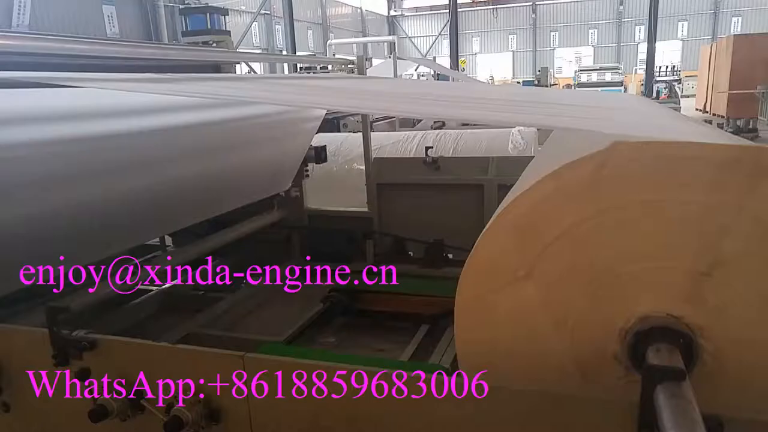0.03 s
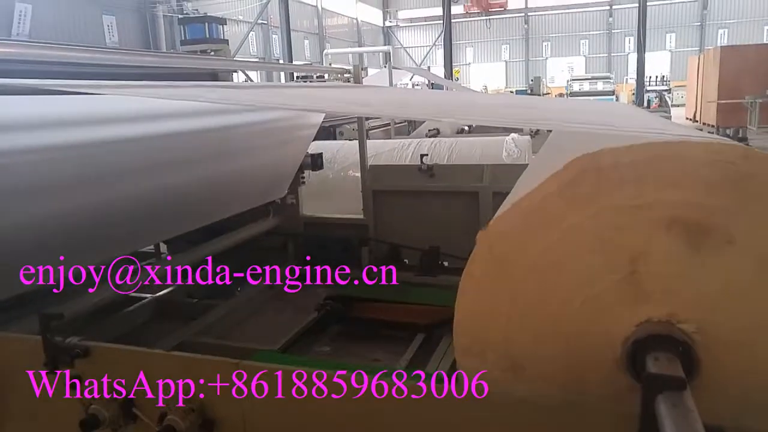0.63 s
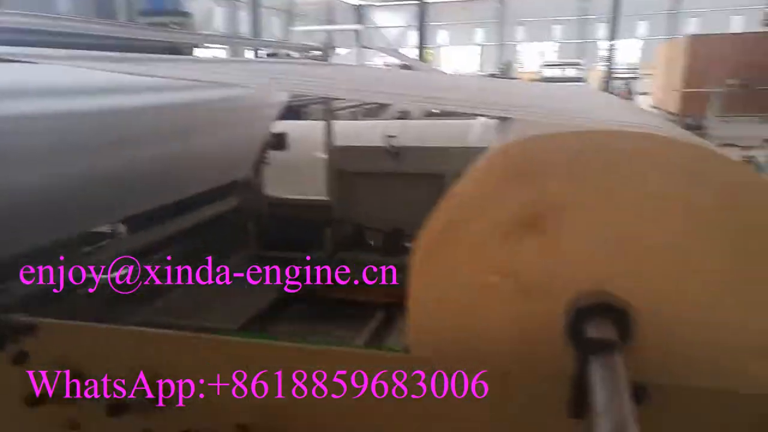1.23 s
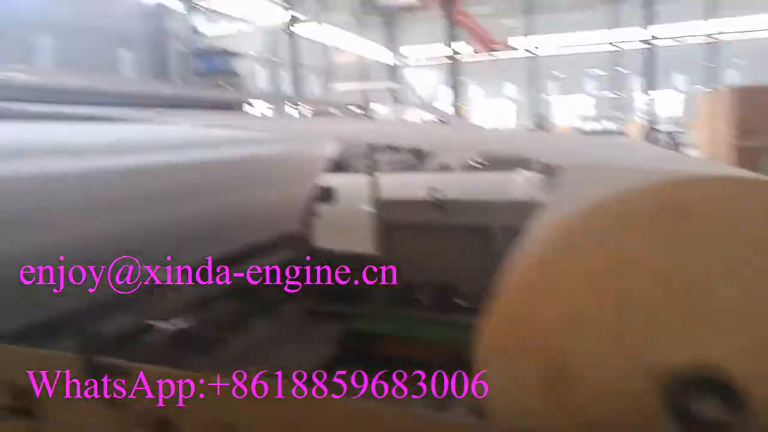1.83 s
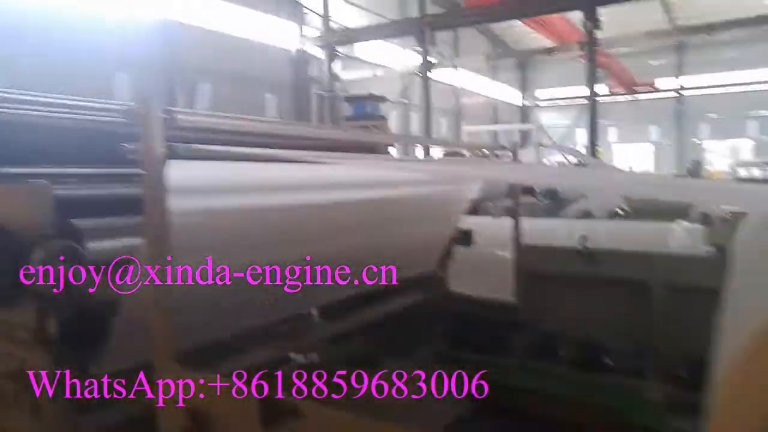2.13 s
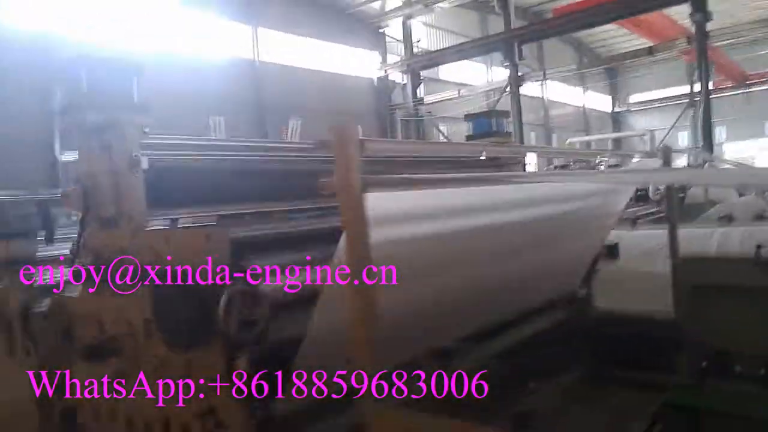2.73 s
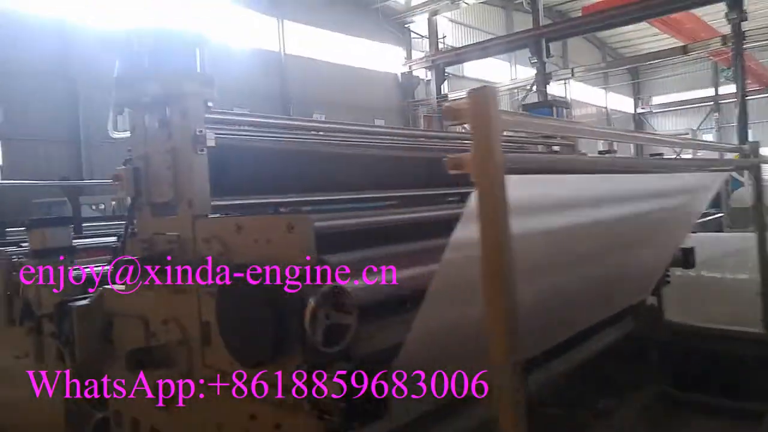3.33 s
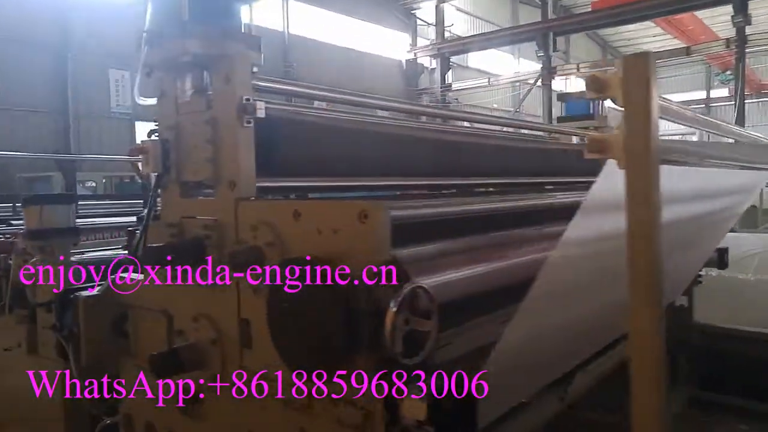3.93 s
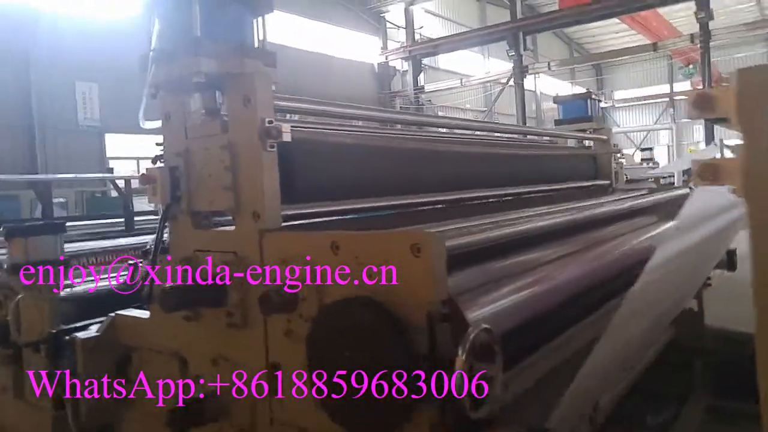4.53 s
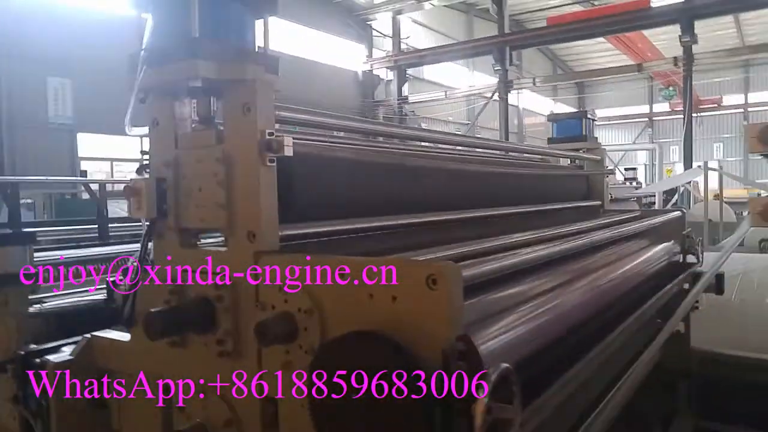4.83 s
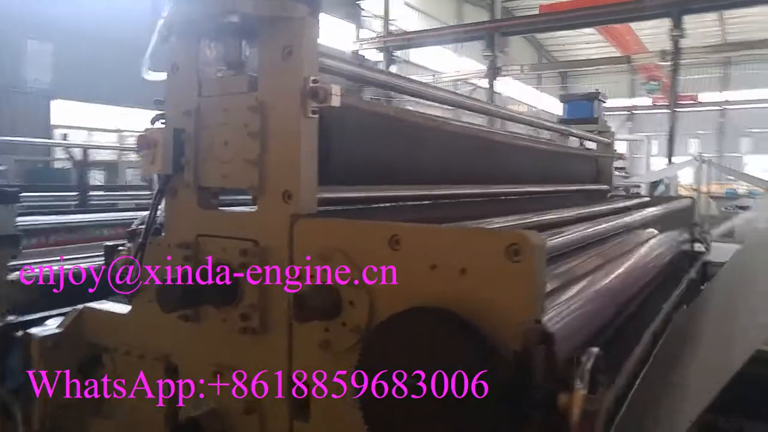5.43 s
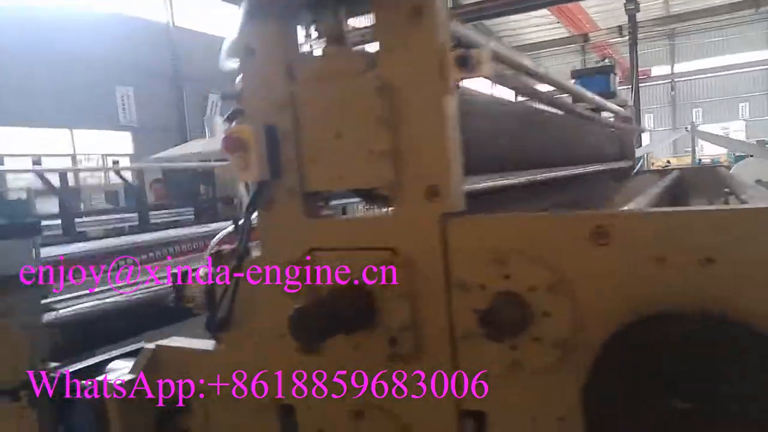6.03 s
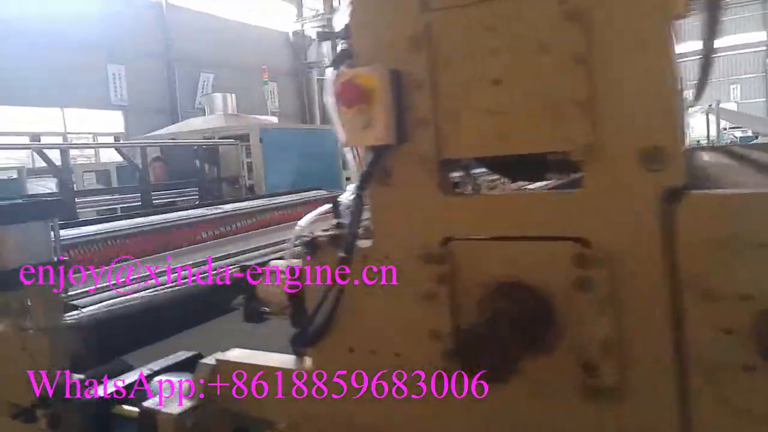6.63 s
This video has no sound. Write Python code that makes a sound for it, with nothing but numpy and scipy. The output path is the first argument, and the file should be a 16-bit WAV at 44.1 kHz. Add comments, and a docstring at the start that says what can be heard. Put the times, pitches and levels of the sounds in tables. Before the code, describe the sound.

After silence, a running paper rewinding machine cuts in abruptly at about 0.6 seconds: a dense rumble, a drone of many gear tones, a fine metallic rattle and a pulsing paper hiss with a faint high whistle. It continues steadily in a large, diffuse factory hall, individual tones swelling and fading as the microphone moves past. From 0.9 to about 3 seconds, paper peels off a big roll in several short swishes, with one sharp knock at 1.2 seconds. From 2.4 seconds onward, the sheet catches on a rubber roller in small, irregular squeaks. Between 3.5 and 5 seconds, the rollers add a throbbing hum, and a bearing whine flares briefly near 4.5 seconds. From about 3.6 seconds the sheet rustles in short bursts, soon also flapping lightly about seven times a second. The machine is still running at the end, around 6.7 seconds.

```python
"""A many-toned drone, a rumble and a pulsing hiss set in together: a paper rewinder, heard on a walk past it.
Gears and rollers sound at multiples of the roller speed, while rolling noise excites the frame's modes.
Friction makes the paper web hiss and a rubber roller squeal; the sheet swishes off the parent roll.
Later the winding roll comes near, and the sheet rustles and flaps with its turns.
The factory hall adds a diffuse field to the direct sound."""
import sys
import numpy as np
from scipy import signal
from scipy.fft import rfft, irfft
from scipy.io import wavfile

SR = 44100
rng = np.random.default_rng(int(sys.argv[2]) if len(sys.argv) > 2 else 0)


def wav_record(signal):
    """Record a signal, one row per channel, as 16-bit PCM in the file named by sys.argv[1]."""
    frames = np.transpose(np.atleast_2d(signal))
    bounded = np.clip(frames, -1, 1)
    # unit amplitude maps onto the largest positive 16-bit level
    quanta = np.round(bounded * 32767).astype(np.int16)
    wavfile.write(sys.argv[1], SR, quanta)


N = 295029
TIME, FREQ = np.arange(N) / SR, np.fft.rfftfreq(N, 1 / SR)
ROLLER_HZ, WINDER_HZ = 12.585, 7.02  # turns a second


def gain_of(db):
    """Decibels to amplitude."""
    return 10 ** (np.asarray(db) / 20)


def unit_rms(x):
    """Normalises to unit rms."""
    return x / np.sqrt(np.mean(x ** 2) + 1e-20)


def spectrum(points):
    """Interpolates on a log-frequency axis."""
    hz, value = np.transpose(points)
    return np.interp(np.log(FREQ + 1), np.log(hz + 1), value)


def follow(rows):
    """Interpolates each column over time."""
    times, *columns = np.transpose(rows)
    return [np.interp(TIME, times, column) for column in columns]


def resonances(modes):
    """Lorentzian peaks in dB."""
    return sum(db / (1 + (2 * (FREQ - hz) / width) ** 2) for hz, width, db in modes)


def drift(rate_hz):
    """Band-limited random motion of unit rms."""
    knots = rng.standard_normal(int(N / SR * 2 * rate_hz) + 4)
    fine = signal.resample(knots, len(knots) * 8)
    return unit_rms(np.interp(TIME * 16 * rate_hz, np.arange(len(fine)), fine))


def pan(left_db):
    """Channel gains for a left-minus-right level difference."""
    return gain_of(np.array([[.5], [-.5]]) * left_db)


def swells(rows, rise=0.48):
    """Skewed Gaussian humps; rise is the share of the length before the peak."""
    return sum(height * np.exp(-((TIME - peak_s) / (length_s * np.where(TIME < peak_s, rise, 1 - rise))) ** 2)
               for peak_s, height, length_s in rows)


def ramp(middle_s, length_s):
    """Linear rise from 0 to 1."""
    return np.clip((TIME - middle_s) / length_s + .5, 0, 1)


def held(start_s, end_s, ramp_s):
    """Trapezoidal envelope."""
    return ramp(start_s, ramp_s) - ramp(end_s, ramp_s)


def once_a_turn(turns, sharpness):
    """A unit hump at every whole turn."""
    return abs(np.cos(np.pi * turns)) ** (2 * sharpness)


# Stereo balance of the noise: frequency_hz, left_db
BALANCE = [(60, 4), (300, 0), (700, 1.1), (1100, 0), (1500, -2), (2100, -1.5), (2800, 2.5), (4500, 1.5),
           (7000, 3.5), (7800, -1), (8400, -2.5), (9300, 1.5), (10300, 0.5), (14000, 3)]
# Sound arriving straight from the machine: frequency_hz, share
DIRECT_SHARE = [(100, 0.24), (1000, 0.36), (2400, 0.37), (4000, 0.098), (7000, .05), (15000, .02)]
def hall_noise(spectrum_db, spacing_s=0.0004, lag_s=0.00044):
    """Spatial coherence: a diffuse field follows a sinc law; direct sound reaches the left first."""
    direct = np.clip(spectrum(DIRECT_SHARE), 0, 1)
    diffuse = (1 - direct) * np.sinc(2 * FREQ * spacing_s)
    coherence = .975 * (diffuse + direct * np.exp(-2j * np.pi * FREQ * lag_s))
    left, independent = rfft(rng.standard_normal((2, N)))
    right = coherence * left + np.sqrt(1 - abs(coherence) ** 2) * independent
    return unit_rms(irfft(np.array([left, right]) * gain_of(spectrum_db) * pan(spectrum(BALANCE)), N))


def band(centre_hz, half_width_hz):
    """Narrow-band noise, frequency-shifted along a pitch curve."""
    middle_hz = np.mean(centre_hz)
    noise = signal.hilbert(hall_noise(-10 * np.log10(1 + ((FREQ - middle_hz) / half_width_hz) ** 4)))
    return (noise * np.exp(2j * np.pi * np.cumsum(centre_hz - middle_hz) / SR)).real


def tones(partials, turns, waver, spread):
    """Rotation tones, modulated by the load and by the walk through standing waves."""
    carrier = max(partials, key=lambda row: row[1])[0]
    turns = turns + rng.random()
    path = drift(0.566) + 0.41
    out = np.zeros((2, N))
    for multiple, db, left_db in partials:
        # eccentricity modulates mainly the pitch: sidebands lie a quarter cycle apart
        phase = 2 * np.pi * multiple * turns + np.pi / 2 * abs(multiple - carrier)
        phase += waver * (drift(1.506) + 0.52 * drift(14))
        # shorter waves differ more between left and right
        offset = spread * multiple * ROLLER_HZ / 1000 * (path + .5 * drift(0.468))
        envelope = gain_of(db) * unit_rms(1 + waver * drift(7))
        out += envelope * pan(left_db) * np.cos([phase + offset, phase - offset])
    return np.sqrt(2) * out


def crackle(events, colour, rise, grain_db):
    """Noise bursts made grainy by fast random amplitude modulation."""
    bursts = swells([(peak_s, gain_of(db), length_s) for peak_s, db, length_s in events], rise)
    return hall_noise(spectrum(colour)) * bursts * unit_rms(gain_of(grain_db * drift(400)))


# Gear tones, one list per shaft group: roller_multiple, base_level_db, left_db
GEAR_TONES = [
    [(11, -36, 1)],
    [(12, -34, 2)],
    [(23, -39.5, 0)],
    [(24.4, -39, 2)],
    [(26, -44, 1), (27, -41, 1), (28, -42, 1)],
    [(28, -44, 1), (29, -38, 1), (31, -45, 1)],
    [(33, -40, 0), (38, -44, 1), (57, -40, 1)],
    [(34, -45, 3), (35, -40, 4)],
    [(49, -41, 1), (52, -36, 3), (53, -35.5, 2)],
    [(66, -35, 2)],
    [(65, -43, 0), (67, -31, 0), (68, -39, 1), (69, -39, -1)],
    [(68, -37, 1), (70, -35, 3)],
    [(72, -43, 3), (73, -41, 0), (74, -38, -4), (80, -39, 2)],
    [(76, -35, 0)],
    [(77, -34, -3), (78, -47, 0)],
]
# Each group's loud and quiet spots on the walk: gain_db, waver, [(peak_s, swell_db, length_s), ...]
GEAR_SPOTS = [ (-1, 0.24, [(1.0, -7, 1.0), (2.3, -6, 1.2), (4.5, 4.5, 0.68), (5.7, 5, 0.99)]),
              (-0.5, 0.03, [(1.0, 2.5, 1.0), (2.6, 5, 1.6), (4.4, -10, 1.2)]), (-5, 0.2, [(1.3, 12, 1),
              (5.9, 7, 0.78)]), (-5.5, -0.05, [(2.12, 8, 0.27), (5.65, 13, 0.73), (6.27, 16.5, 0.44)]),
              (-3.5, 0.6, [(2.58, 11, 0.23), (3.45, 8.5, 1), (4.1, 10, 0.23)]), (-4, 0.5, [(0.85, 5, 0.27),
              (1.65, 1, 0.29), (2.9, 8, 0.84), (4.6, -1, 0.38)]), (-10.5, .2, [(1.3, 9, 1.2),
              (2.25, 7, .65)]), (-0.5, 0.4, [(2.85, -12, 0.76), (5.4, 6, 0.76), (6.0, 8.5, .4)]),
              (-5.5, 0.05, [(1.1, 6, 0.57), (2.7, 5, .6), (3.8, 8, 1), (4.5, 6.5, 0.73)]),
              (-3.5, 0.2, [(1.2, -2, 1.4), (3.3, 5, .5), (4.4, 0, .6), (6.05, 4.5, .9)]),
              (-1.3, 0.26, [(1.0, 4, .7), (1.85, 5.5, 0.35), (2.35, 1, 0.37), (3.35, 1.5, 0.42),
              (4.4, 1, .5), (5.2, 2.5, 0.4), (6.0, -12, 0.6)]), (-7, -0.2, [(1.0, 9, .9), (2.65, 7.5, 0.8),
              (5, 6, .8)]), (-9.5, -0.1, [(0.8, 10, 0.93), (1.9, 12, 0.9)]), (-3.5, 0.06, [(1.2, -1, 1.2),
              (2.8, 4.5, 1.6), (4.9, 2, 0.67), (6.6, 5, .4)]), (-6.5, 0.3, [(1.5, 4, 1.6), (2.9, -2, 0.59),
              (3.8, 6.5, .5), (4.7, 9.5, 0.6), (6.0, -8, .7)])]
# Imbalance tones: roller_multiple, level_db, left_db
THROB_TONES = [(5, -42, 1), (5.7, -44, 1)]
def drive(turns):
    """Forced vibration: gear meshes sing with sidebands, and roller imbalance throbs."""
    gears = sum(gain_of(db + swells(spots)) * tones(group, turns, waver, spread=0.34)
                for group, (db, waver, spots) in zip(GEAR_TONES, GEAR_SPOTS))
    return gears + tones(THROB_TONES, turns, waver=0.16, spread=.4)


# Rolling noise: frequency_hz, relative_db
RUMBLE_SPECTRUM = [(20, -33), (35, -26), (46, -12), (55, -11), (68, -3.5), (105, -4.3), (170, -6.5),
                   (205, -2), (240, -1.5), (400, -2), (480, -3), (535, -6), (610, 2), (900, -3.5),
                   (1200, -12.5), (2500, -33.5)]
# Frame resonances: frequency_hz, width_hz, boost_db
FRAME_MODES = [(320, 18, 1.5), (356, 27, 2.5), (440, 50, 2.5), (750, 180, 2), (844, 30, 6)]
def rumble(level_db=-20, comb_db=2.2, shake_db=0.63):
    """Comb filtering: rolling noise in the frame partly repeats with every turn."""
    comb = comb_db * np.cos(2 * np.pi * FREQ / ROLLER_HZ)
    body = hall_noise(spectrum(RUMBLE_SPECTRUM) + resonances(FRAME_MODES) + comb)
    return body * gain_of(level_db + shake_db * drift(25))


# Rattle of bearings and guards: frequency_hz, relative_db
CLATTER_SPECTRUM = [(500, -15), (1000, 1), (1250, -1.5), (1550, -0.5), (1900, -5.5), (2500, -5), (3100, -9),
                    (4500, -10), (9000, -21)]
# Sheet-metal resonances: frequency_hz, width_hz, boost_db
GUARD_MODES = [(1376, 67, 5.5), (1760, 62, 4), (2110, 270, 3), (3220, 77, 3)]
def clatter(start_db=-27, approach_db_per_s=0.3757, rattle_db=1.3):
    """Plate resonance: a fine rattle rings the guards, louder as the listener nears the frame."""
    rattle = hall_noise(spectrum(CLATTER_SPECTRUM) + resonances(GUARD_MODES))
    return rattle * gain_of(start_db + approach_db_per_s * TIME + rattle_db * drift(60))


# Flares of the whine: peak_s, swell_db, length_s
BEARING_FLARES = [(4.47, 16.4, 0.15), (4.7, 7, 0.35), (6.24, 6.5, 0.25), (6.63, 11, 0.19)]
def bearing_whine(pitch_hz=1110, base_db=-43):
    """Amplitude modulation: a bearing's faint, constant tone flares up now and then."""
    whine = tones([(pitch_hz / ROLLER_HZ, 0, 0)], ROLLER_HZ * TIME, waver=.55, spread=.5)
    return whine * gain_of(base_db + swells(BEARING_FLARES))


# Switching tone and sidebands: frequency_hz, relative_db
INVERTER_LINES = [(11800, -57), (12020, -49), (12260, -56)]
def inverter(level_db=-45, half_width_hz=35):
    """Line broadening: the motor's load smears its switching frequency."""
    lines = sum(gain_of(db) / (1 + ((FREQ - hz) / half_width_hz) ** 2) for hz, db in INVERTER_LINES)
    return hall_noise(20 * np.log10(lines)) * gain_of(level_db)


# Hiss of sliding paper: frequency_hz, relative_db
HISS_SPECTRUM = [(1200, -13), (3000, -2.5), (4700, -4), (6200, 0.5), (7100, -1), (7500, 1.5), (7800, -1.5),
                 (8350, 2.5), (9200, -6), (10000, -3.5), (11500, -8), (13500, -18), (15800, -12)]
# Its resonances: frequency_hz, width_hz, boost_db
HISS_MODES = [(3550, 53, 8.5), (6900, 360, 3.5)]
# Finer sizzle: frequency_hz, relative_db
SIZZLE_SPECTRUM = [(3000, -15), (7000, -3), (7800, -5), (8400, 5), (9200, 8.5), (10200, -2), (11500, -2.5),
                   (13500, 0), (15800, 1.5)]
# Along the walk: time_s, sizzle_db, left_db, relative_pulse_depth
SIZZLE_PATH = [(0.65, -30, -7, 1), (1.8, -28.5, -1.5, 0.5), (2.8, -36, 10, 1.3), (3.2, -35, -5, 0),
               (3.65, -31.5, -6, 0.2), (5.4, -35, -5, 0.5), (6.7, -34.5, -5, -0.5)]
def web(turns, winder_turns, hiss_db=-27.5, flap_db=1.8, shiver_db=0.87, grain_db=0.6):
    """Friction noise: sliding paper swells once a roller turn and flaps with the winding roll."""
    sizzle_db, left_db, depth = follow(SIZZLE_PATH)
    pulse = depth * np.cos(2 * np.pi * (turns - 0.82))
    winder_nearness = ramp(middle_s=4.3, length_s=0.57)
    flaps = winder_nearness * once_a_turn(winder_turns, sharpness=1.5) * (1 + 0.24 * drift(2.6))
    hiss = hall_noise(spectrum(HISS_SPECTRUM) + resonances(HISS_MODES)) * gain_of(hiss_db + 0.84 * pulse)
    sizzle = hall_noise(spectrum(SIZZLE_SPECTRUM)) * gain_of(sizzle_db + 2.8 * pulse) * pan(left_db)
    return (hiss + sizzle) * gain_of(flap_db * flaps + shiver_db * drift(25) + grain_db * drift(500))


# Air rushing between the rollers: time_s, level_db, centre_hz, left_db
AIR_RUSH = [(.65, -32.5, 2399, -4), (1.7, -35.5, 2302, -9), (2.25, -31, 2250, -5.5), (2.5, -33, 2197, -3),
            (3.3, -36, 2146, -2), (4.4, -36, 2353, 1.5), (6.7, -38, 2595, 3)]
# Slipping rubber roller: time_s, level_db, pitch_hz
ROLLER_SQUEAL = [(.65, -44, 2240), (2.4, -42, 2183), (3.3, -44, 2130), (3.9, -40, 2293), (4.4, -35.5, 2385),
                 (5.2, -40, 2502), (5.9, -38.5, 2582), (6.7, -36, 2635)]
def nip(winder_turns, glide_hz=69.7, wander_hz=55.15, pulse_db=2.6, chatter_db=2.6, rattle_db=1.5):
    """Stick-slip: rubber squeals, modulated by the winding roll, as air rattles through the nip."""
    rush_db, centre_hz, left_db = follow(AIR_RUSH)
    slip_db, slip_hz = follow(ROLLER_SQUEAL)
    slips = drift(34)
    angle = 2 * np.pi * winder_turns
    rush = band(centre_hz, half_width_hz=350) * gain_of(rush_db + rattle_db * slips)
    pitch_hz = slip_hz + glide_hz * np.sin(angle) + wander_hz * drift(22)
    squeal_db = slip_db + pulse_db * np.cos(angle) + chatter_db * slips
    squeal = band(pitch_hz, half_width_hz=72) * gain_of(squeal_db)
    return (rush + squeal) * pan(left_db)


# Shrill modes of the sheet: pitch_hz, level_db, left_db
SHEET_MODES = [(7040, -38.5, 2.5), (8430, -39, -3.5), (9090, -42.5, 1)]
def flutter(wander_hz=170, surge_db=4.5):
    """Membrane resonance: each mode of the taut, fluttering sheet surges independently."""
    out = np.zeros((2, N))
    for hz, db, left_db in SHEET_MODES:
        mode = band(hz + wander_hz * drift(17), half_width_hz=110)
        surges = unit_rms(gain_of(surge_db * drift(15)))
        out += mode * surges * gain_of(db) * pan(left_db)
    return out


# Whistle of the sheet's edge: time_s, level_db, pitch_hz
EDGE_WHISTLE = [(.65, -48, 6870), (1.9, -42, 6930), (2.6, -38, 7000), (3.1, -44, 7070), (3.4, -41, 7030),
                (4.3, -42, 7220), (5.4, -45, 7220), (6.7, -38, 7310)]
def edge_whistle(wander_hz=95, left_db=3):
    """Narrow-band noise is heard as pitch: the edge whistles thinly, creeping upward."""
    level_db, pitch_hz = follow(EDGE_WHISTLE)
    return band(pitch_hz + wander_hz * drift(9.8), half_width_hz=65) * gain_of(level_db) * pan(left_db)


# Peeling swishes, the last (4.19 s) a short tick in the mechanism: peak_s, level_db, length_s
PEELS = [(0.917, -27, 0.06), (1.115, -24.5, 0.075), (1.503, -24, 0.06), (2.202, -24, 0.068),
         (2.533, -26.5, 0.048), (2.895, -27, .022), (3.51, -30.5, 0.11), (4.194, -23, .012)]
# Their spectrum: frequency_hz, relative_db
PEEL_SPECTRUM = [(1500, -35), (2800, 1), (4200, 5), (5000, 6), (5800, 6), (6800, 7.5), (8000, -11),
                 (15000, -27)]
def peeling():
    """Transient noise: paper leaves the parent roll in bursts of fast attack and slower decay; a short tick at
    4.19 s shares their colour."""
    return crackle(PEELS, PEEL_SPECTRUM, rise=0.23, grain_db=2.0) * pan(2.5)


# Knocks in the mechanism: start_s, level_db, pitch_hz
KNOCKS = [(1.2039, -3.5, 603), (5.424, -16, 1390), (6.494, -21, 2500)]
def knocks(decay_s=0.0013):
    """Impulse response: each knock rings as a damped sinusoid."""
    out = np.zeros(N)
    for start_s, db, hz in KNOCKS:
        age = np.maximum(TIME - start_s, 0)
        out += gain_of(db) * np.exp(-age / decay_s) * np.sin(2 * np.pi * hz * age)
    return out


# Contact with guide bars: start_s, end_s, ramp_s, centre_hz, half_width_hz, level_db, left_db
BAR_RUBS = [(1.35, 2.32, .15, 2730, 80, -41.5, -4), (1.936, 2.97, 0.17, 6700, 600, -38, 12)]
def rubbing():
    """Sliding friction: the sheet on the guide bars sustains bands of noise."""
    return sum(band(hz, half_width_hz) * held(start_s, end_s, ramp_s) * gain_of(db) * pan(left_db)
               for start_s, end_s, ramp_s, hz, half_width_hz, db, left_db in BAR_RUBS)


# The sheet catching on the rubber roller: peak_s, level_db, pitch_hz, length_s
CATCHES = [(2.392, -32, 2170, .02), (2.45, -27, 2260, .02), (2.981, -32, 2137, .03),
           (3.067, -28.5, 2340, .025), (3.207, -31, 2050, .025), (3.46, -33, 2200, .04),
           (3.915, -28, 2390, 0.033), (4.236, -31, 2360, 0.051), (4.49, -27.5, 2410, .045),
           (4.56, -34, 2650, .05), (4.673, -27, 4320, .015), (4.828, -31, 2580, .055),
           (5.087, -26, 2420, .02), (5.133, -29, 2600, .035), (5.283, -29, 2460, 0.034),
           (5.418, -32, 2610, .06), (5.64, -29.5, 2445, .025), (5.69, -33, 2790, 0.063),
           (5.849, -30.5, 2537, .075), (6.0, -30, 2560, 0.099), (6.108, -27, 2810, 0.027),
           (6.164, -32, 2170, 0.017), (6.246, -27.5, 2900, .045), (6.39, -35, 2720, .055),
           (6.518, -26.5, 2610, 0.051), (6.568, -28, 2610, 0.029)]
def squeaks(rise_hz_per_s=2200, jitter_hz=75, roughness=.45, left_db=5.0):
    """Stick-slip: the sheet catches and lets go in rising chirps, decorrelated by the hall."""
    peak_s, db, hz, length_s = np.transpose(CATCHES)
    nearest = np.argmin(abs(TIME - peak_s[:, None]), axis=0)
    pitch_hz = hz[nearest] + rise_hz_per_s * (TIME - peak_s[nearest])
    channels = []
    for _ in range(2):
        phase = 2 * np.pi * np.cumsum(pitch_hz + jitter_hz * drift(130)) / SR
        channels.append(unit_rms(np.cos(phase) * (1 + roughness * drift(90))))
    return np.array(channels) * swells(zip(peak_s, gain_of(db), length_s)) * pan(left_db)


def roller_drone(winder_turns, pitch_hz=657, level_db=-26):
    """Resonance: hollow rollers drone as the listener passes, swelling with each winding turn."""
    envelope = held(start_s=3.43, end_s=5, ramp_s=0.18) * once_a_turn(winder_turns, sharpness=1.8)
    return band(pitch_hz, half_width_hz=9.8) * envelope * gain_of(level_db)


# Rustles of the slack sheet: peak_s, level_db, length_s
SLACK_RUSTLES = [(3.595, -30, .06), (3.792, -31, .055), (4.1, -29, 0.039), (4.53, -28, 0.034),
                 (4.672, -28.5, .035), (4.82, -26, .045), (4.962, -27, 0.046), (5.06, -27, .04),
                 (5.29, -28, 0.046), (5.403, -25, 0.044), (5.518, -28, .05), (5.847, -32, 0.042),
                 (5.962, -28.5, .05), (6.238, -28, .05), (6.4, -28, 0.038), (6.498, -25, .06)]
# Their spectrum: frequency_hz, relative_db
RUSTLE_SPECTRUM = [(3000, -23), (5000, -9), (6300, -6), (7200, 3), (7800, -7), (8400, -3), (9400, -8),
                   (12000, -19), (15800, -26)]
def rustling():
    """Transient noise: the sheet crackles as it goes slack before the winding roll."""
    return crackle(SLACK_RUSTLES, RUSTLE_SPECTRUM, rise=0.38, grain_db=3.0) * pan(-0.6)


def scene():
    """Superposition of machine and paper, paced by the wavering rollers and the slower winding roll."""
    turns = ROLLER_HZ * TIME + 0.0013 * drift(0.729)
    winder_turns = WINDER_HZ * (TIME - 5.4)  # a flap falls at 5.4 s
    machine = drive(turns) + rumble() + clatter() + bearing_whine() + inverter()
    paper = web(turns, winder_turns) + nip(winder_turns) + flutter() + edge_whistle()
    events = peeling() + knocks() + rubbing() + squeaks() + roller_drone(winder_turns) + rustling()
    return machine + paper + events


def record(dry, start_s=0.6287, dull_hz=3900, dull_half_width_hz=1300, cutoff_hz=15780):
    """Gating and filtering: an abrupt onset, a brief dulling on the right, and a low-pass."""
    presence = irfft(rfft(dry[1]) / (1 + ((FREQ - dull_hz) / dull_half_width_hz) ** 4), N)
    dull_share = 0.35 * held(start_s=2.37, end_s=3.1, ramp_s=0.17)
    stereo = np.array([dry[0], dry[1] - dull_share * presence])
    gate = np.clip((TIME - start_s) / 0.0025, 0, 1)
    low_pass = signal.firwin(901, cutoff_hz, window=("kaiser", 10), fs=SR)
    return signal.oaconvolve(stereo * gate, low_pass[None], "same")


dry = scene()
out = record(dry)
wav_record(out)
```